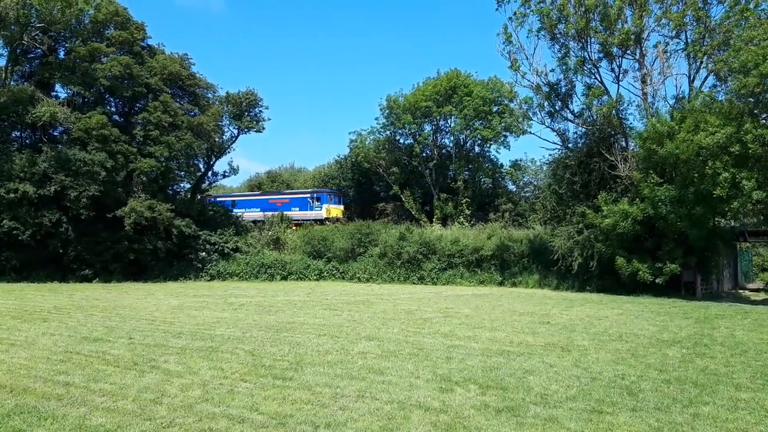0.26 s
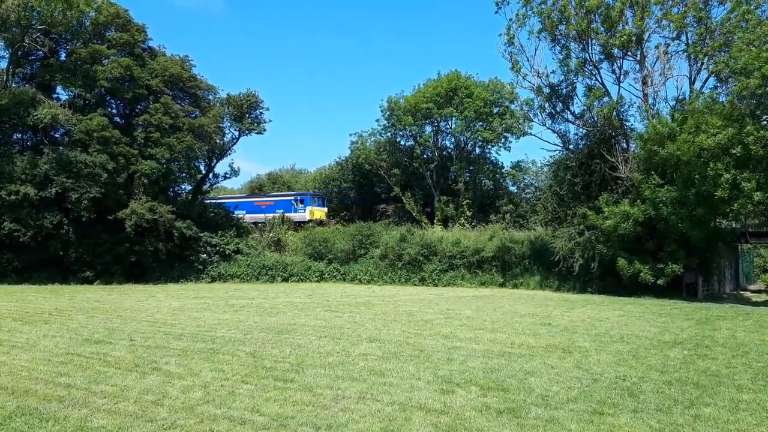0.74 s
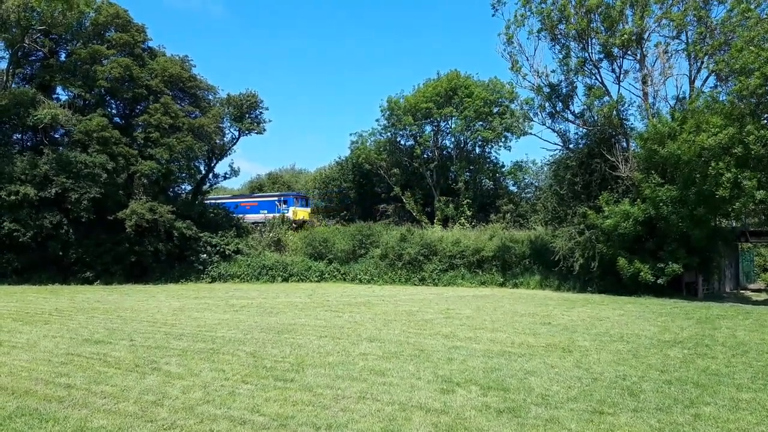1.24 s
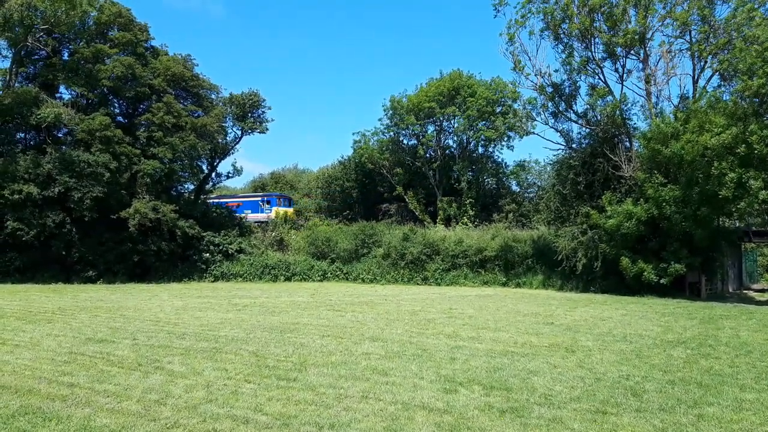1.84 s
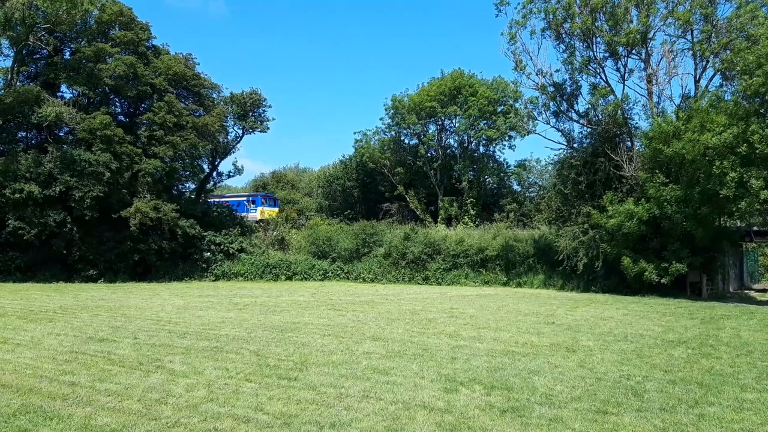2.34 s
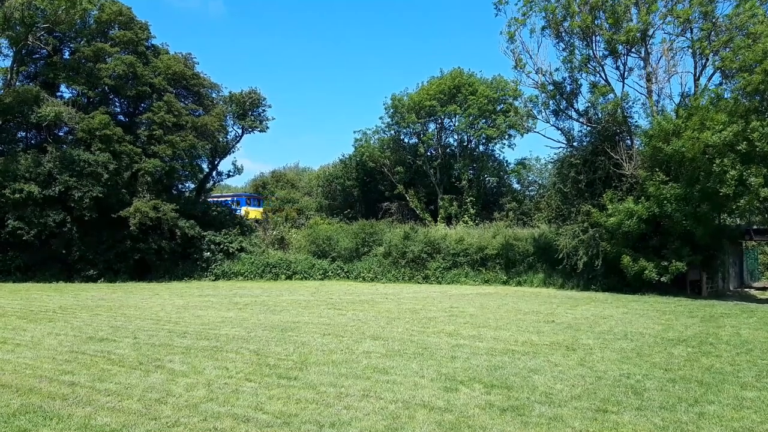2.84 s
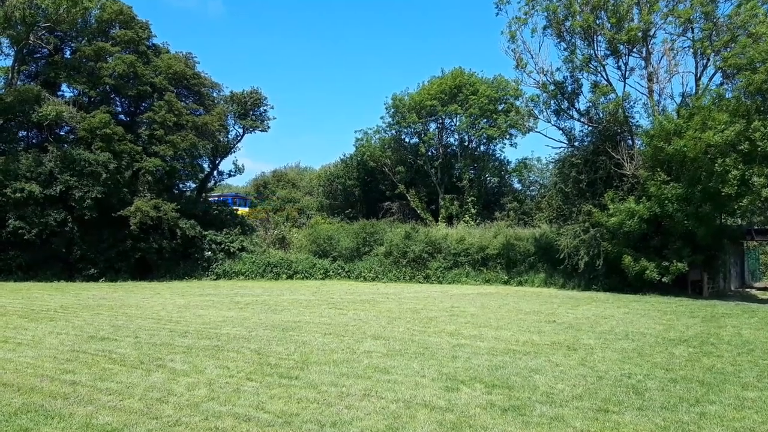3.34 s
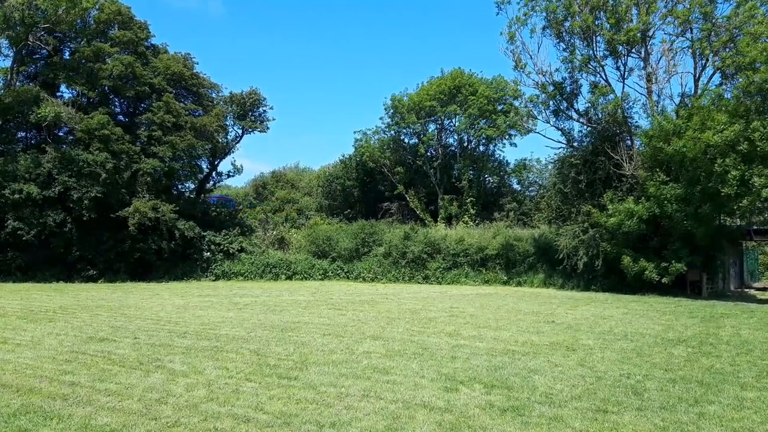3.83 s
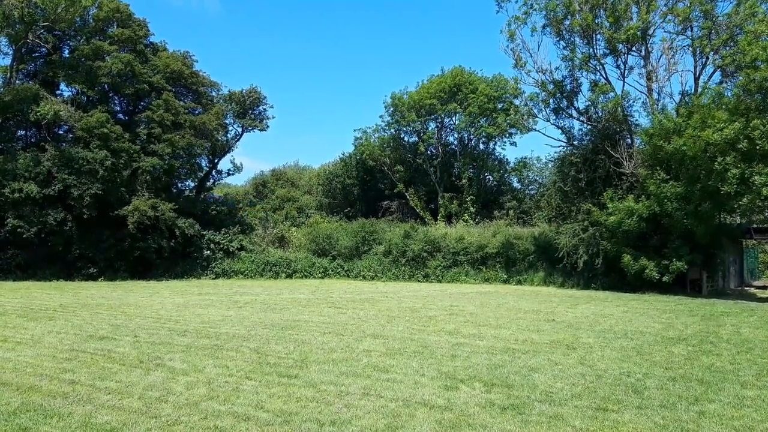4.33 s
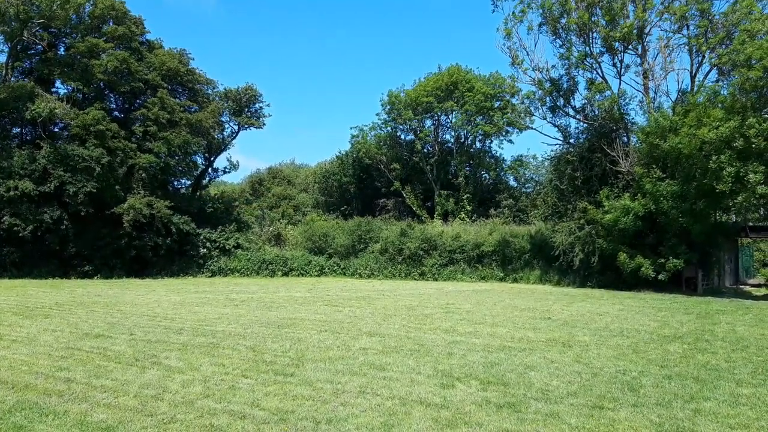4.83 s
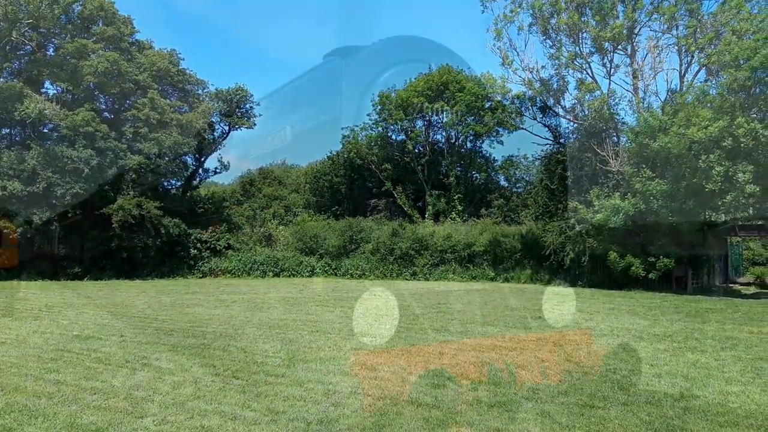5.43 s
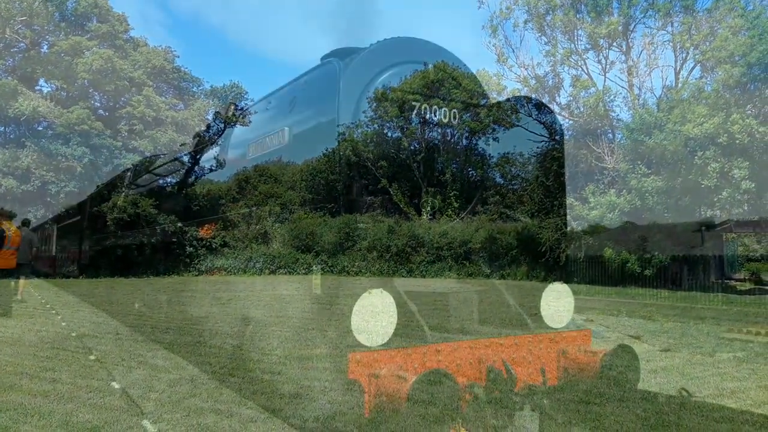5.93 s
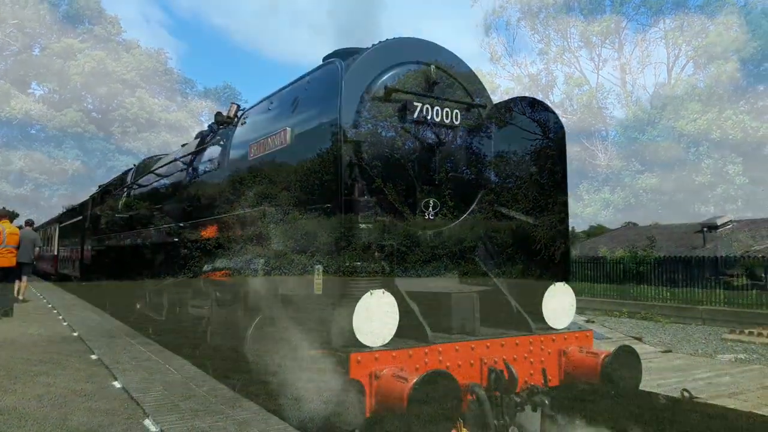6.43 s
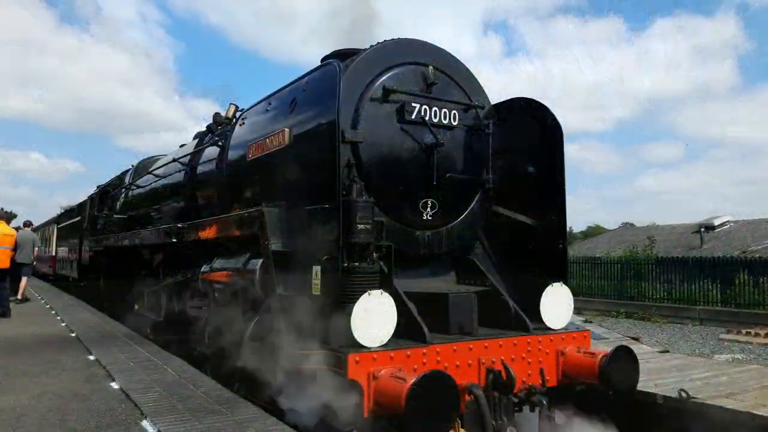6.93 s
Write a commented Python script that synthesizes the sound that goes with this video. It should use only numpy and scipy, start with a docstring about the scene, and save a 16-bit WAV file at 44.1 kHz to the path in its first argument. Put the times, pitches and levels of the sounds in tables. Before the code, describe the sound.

Across an open meadow, a distant train works away behind trees: soft low chuffs nearly three per second, faint rumble, leafy rolling noise, thin flange squeals, a few bird chirps and dull rail-joint clacks. Around three seconds a steam hiss enters quietly and keeps growing, covering the fading train until a standing engine's hollow, sputtering jet fills the close view. Identical, centred sound in both channels.

```python
"""Soft exhaust beats come first, across a meadow: a steam engine working away behind trees, with a low
rumble, rolling noise, a thin flange squeal, dull knocks at rail joints and a few birds. That scene fades
into a standing engine close by, whose steam hisses through the hollows of pipes, frames and platform edge.
Blast, rolling and steam are coloured noise; joints, birds and whistles are short sine tones; squeals and
rail hum are noise in narrow resonances. Both channels carry the same scene, each with its own faint hiss."""
import sys
import numpy as np
from scipy import signal
from scipy.fft import rfft, irfft, next_fast_len
from scipy.io import wavfile
from scipy.ndimage import uniform_filter1d, map_coordinates

SR = 44100
rng = np.random.default_rng(int(sys.argv[2]) if len(sys.argv) > 2 else 0)


def unload_audio(sound):
    """Save the sound as a 16-bit wav file, at the path given as the first command line argument."""
    columns = np.transpose(np.atleast_2d(sound))
    # keep every value between -1 and 1, then stretch to whole-number steps
    steps = np.round(np.clip(columns, -1, 1) * 32767)
    wavfile.write(sys.argv[1], SR, steps.astype(np.int16))


N = 316197
T = np.arange(N) / SR  # time axis in seconds


def amp(db):
    """Decibels to amplitude."""
    return 10 ** (np.asarray(db) / 20)


def unit(x):
    """Scales a signal to an rms of 1."""
    return x / np.sqrt(np.mean(x ** 2) + 1e-20)


def along(points, hz):
    """Reads a value from (freq_hz, value) points along a log frequency axis."""
    point_hz, value = np.transpose(points)
    return np.interp(np.log(hz + 1), np.log(point_hz + 1), value)


def curve(points):
    """Joins (time_s, value) points by straight lines, one value per sample."""
    time_s, value = np.transpose(points)
    return np.interp(T, time_s, value)


def ramp(start_s, end_s):
    """Rises evenly from 0 to 1 between two times."""
    return np.clip((T - start_s) / (end_s - start_s), 0, 1)


def wobble(knots_per_s):
    """A smooth random curve through normally distributed knots."""
    knots = rng.standard_normal(int(N * knots_per_s / SR) + 4)
    return map_coordinates(knots, [T * knots_per_s])


def filtered(x, response):
    """Multiplies the spectrum of x by a response of frequency."""
    size = next_fast_len(N + SR // 2)
    spectrum = rfft(x, size) * response(np.fft.rfftfreq(size, 1 / SR))
    return irfft(spectrum, size)[..., :N]


def shaped(points):
    """The response of a (freq_hz, density_db) spectrum."""
    return lambda hz: amp(along(points, hz))


def peak(hz, centre_hz, width_hz):
    """One resonance: a bell in frequency, 1 at its centre and half that at the edges of its width."""
    return 1 / (1 + (2 * (hz - centre_hz) / width_hz) ** 2)


def resonance_power(hz, resonances):
    """Summed power of (centre_hz, width_hz, level_db) resonances."""
    return sum(amp(2 * db) * peak(hz, centre, width) ** 2 for centre, width, db in resonances)


def hollowed(spectrum, hollows, floor_db):
    """A spectrum shifted to floor_db, with the resonances of hollows standing on it."""
    return lambda hz: shaped(spectrum)(hz) * np.sqrt(amp(2 * floor_db) + resonance_power(hz, hollows))


def rush(response, patchy_db):
    """Coloured turbulent noise of rms 1, its gain varying in soft patches over time and frequency."""
    grid = signal.stft(rng.standard_normal(N), nperseg=512)[2]
    patches = uniform_filter1d(rng.standard_normal(grid.shape), size=8, axis=0)
    patches = unit(uniform_filter1d(patches, size=12, axis=1))
    noise = signal.istft(grid * amp(patchy_db * patches), nperseg=512)[1][:N]
    return unit(filtered(noise, response))


def steady(x, seconds):
    """Evens out the chance swells of narrow noise."""
    power = np.abs(uniform_filter1d(x ** 2, size=round(seconds * SR)))
    return unit(x / np.sqrt(power + 0.16))


# Low end of the distant train, relative: freq_hz [Hz], density_db [dB per Hz]
RUMBLE_SPECTRUM = [(12, -46), (20, -28), (64, -2.5), (92, 3.5), (168, -7), (296, -18.5), (362, -15.5),
                   (400, -28), (520, -51), (880, -120)]


def rumble():
    """Low noise of the train, wavering slowly and sinking as it draws away."""
    start_db, recedes_db_per_s = -43.5, 0.58
    level_db = start_db - recedes_db_per_s * T + 0.47 * wobble(2.97)
    return amp(level_db) * rush(shaped(RUMBLE_SPECTRUM), patchy_db=-0.2)


# Rolling noise among the leaves, relative: freq_hz [Hz], density_db [dB per Hz]
LEAF_SPECTRUM = [(150, -15), (250, -5.5), (436, -10), (748, -2.5), (957, -9), (1200, -9), (1720, -11.5),
                 (2040, -14.5), (2900, -11), (3700, -12.5), (4100, -12.5), (6600, -15.5), (7600, -25),
                 (8800, -43), (9500, -67)]


def rolling():
    """Broad rolling noise of the train among the leaves; it sinks faster than the rumble."""
    start_db, recedes_db_per_s = -43.5, 0.94
    level_db = start_db - recedes_db_per_s * T + 0.25 * wobble(2.38)
    return amp(level_db) * rush(shaped(LEAF_SPECTRUM), patchy_db=1.2)


# Bird chirps: middle_s [s], level_db [dB], pitch_hz at the middle [Hz], length_s [s]
BIRD_CHIRPS = [(.3, -48, 2800, .05), (.55, -50, 3000, 0.07), (1.13, -48, 2980, .06), (1.24, -49, 2800, .05),
               (2.855, -62, 7500, .03)]


def birds():
    """Short sine chirps that slide down a little, with a rough edge from random phase."""
    out = np.zeros(N)
    for middle_s, level_db, pitch_hz, length_s in BIRD_CHIRPS:
        u = (T - middle_s) / length_s
        phase = 2 * np.pi * pitch_hz * (T - middle_s) * (1 - 0.014 * u) + 1.4 * wobble(90)
        out += amp(level_db) * np.exp(-4 * u ** 2) * np.sin(phase)
    return out


# Upper squeal, lower squeal, hum of the rails, in that order: centre_hz [Hz], width_hz [Hz]
RAIL_RESONANCES = [(3670, 86), (1867, 32), (1130, 190)]
# Upper squeal: start_s [s], end_s [s], top_db before the release [dB]
UPPER_SQUEALS = [(.05, 0.398, -52), (.42, 1.283, -50), (1.4, 2.27, -55), (2.2, 3.0, -52)]
# Lower squeal, then hum of the rails: level_db [dB], dying_from_s [s]
LOWER_TONES = [(-59.5, 1.7), (-56.5, 1.7)]


def flanges_and_rails():
    """Squealing flanges and humming rails: noise in narrow resonances that swells or dies away."""
    grows_db_per_s, edge_s, dies_db_per_s = 7, 0.063, 11
    upper = np.zeros(N)
    for start_s, end_s, top_db in UPPER_SQUEALS:
        swell = amp(top_db - grows_db_per_s * np.abs(end_s - T))
        upper += swell * ramp(start_s, start_s + edge_s) * (1 - ramp(end_s - edge_s, end_s))
    gains = [upper]
    for level_db, dying_from_s in LOWER_TONES:
        lost_db = dies_db_per_s * np.maximum(T - dying_from_s, 0)
        gains.append(amp(level_db - lost_db + 1.7 * wobble(2.8)))
    out = np.zeros(N)
    for gain, (centre_hz, width_hz) in zip(gains, RAIL_RESONANCES):
        out += gain * rush(lambda hz: peak(hz, centre_hz, width_hz), patchy_db=1.1)
    return out


# Wheels on rail joints: start_s [s], level_db before the onset is rounded [dB],
# pitch_hz at the strike [Hz], t60_s [s]
JOINT_KNOCKS = [(1.082, -32, 1130, .06), (1.092, -28.5, 700, 0.056), (1.118, -27, 86, 0.15),
                (1.749, -23.5, 1140, 0.033), (1.757, -21.5, 706, 0.047)]


def joints():
    """Short dull clacks that sag in pitch, each with a noisy rattle scattered back from the trees."""
    onset_s, rattle_db, rattle_t60_s = 0.0017, -22.5, 0.45
    clacks, rattle = np.zeros((2, N))
    for start_s, level_db, pitch_hz, t60_s in JOINT_KNOCKS:
        t = np.maximum(T - start_s, 0)
        rise = 1 - np.exp(-t / onset_s)
        sag = 1 - 4 * np.minimum(t, t60_s)
        tone = np.sin(2 * np.pi * pitch_hz * t * sag + 0.92 * wobble(150))
        clacks += amp(level_db - 60 * t / t60_s) * rise * tone
        rattle += amp(level_db + rattle_db - 60 * t / rattle_t60_s) * rise
    return clacks + rattle * rush(lambda hz: peak(hz, 730, 700), patchy_db=2.0)


def puff(u):
    """A burst around u = 0, quicker to rise than to fall, that hangs on a little among the trees."""
    u_abs = np.abs(u)
    body = np.exp(-(u_abs / 0.5) ** np.where(u < 0, 4.5, 2.8))
    tail = amp(-6.5) * (u > 0) * (1 - np.exp(-3 * u_abs)) * np.exp(-1.1 * u_abs)
    return body + tail


# Exhaust beats: middle_s [s], level_db of the boom [dB], bark_db [dB re level_db], length_s [s]
EXHAUST_BEATS = [(0.121, -35, -6.5, 0.11), (0.499, -33.5, -9.5, 0.091), (0.864, -32.5, -11, 0.072),
                 (1.24, -34, -10.5, 0.11), (1.62, -31, -9, 0.071), (1.988, -34, -9, 0.085),
                 (2.344, -36, -9, 0.1), (2.72, -35.5, -8.5, 0.094), (3.097, -34, -7, 0.095),
                 (3.456, -32.5, -11, 0.09), (3.814, -32.5, -8, 0.059), (4.187, -37, -6, 0.085),
                 (4.563, -38.5, 1, 0.075), (4.897, -34.5, -2, 0.11), (5.272, -41.5, -9, 0.065),
                 (5.6, -41, -9, 0.087), (5.936, -34, -10, 0.072)]
# Booming of the blast in the chimney: centre_hz [Hz], width_hz [Hz], level_db [dB, relative]
CHIMNEY_MODES = [(170.7, 28, 2), (205.5, 65, -3), (315, 130, -16)]
# Bark of the blast, relative: freq_hz [Hz], density_db [dB per Hz]
BARK_SPECTRUM = [(250, -23), (330, -1), (450, -4), (750, 3), (950, -1.5), (1200, -44), (1600, -70)]
# Top edge of the blast, relative: freq_hz [Hz], density_db [dB per Hz]
EDGE_SPECTRUM = [(800, -30), (1050, -1.5), (1350, -3), (1750, -13), (3000, -16), (6500, -16), (8500, -55)]


def exhaust():
    """Each beat is a puff of turbulent steam: it booms in the chimney, with a shorter bark and edge above."""
    short_share, edge_db = 0.86, -4.5  # bark length re boom; edge level re bark
    boom, bark = np.zeros((2, N))
    for middle_s, level_db, bark_db, length_s in EXHAUST_BEATS:
        boom += amp(level_db) * puff((T - middle_s) / length_s)
        bark += amp(level_db + bark_db) * puff((T - middle_s) / (short_share * length_s))
    chimney = lambda hz: np.sqrt(resonance_power(hz, CHIMNEY_MODES))
    out = boom * steady(rush(chimney, patchy_db=-0.5), seconds=0.053)
    out += bark * steady(rush(shaped(BARK_SPECTRUM), patchy_db=1.0), seconds=0.054)
    return out + amp(edge_db) * bark * rush(shaped(EDGE_SPECTRUM), patchy_db=1.0)


def far_train():
    """The whole train across the meadow; distance takes away the top of the spectrum."""
    top_hz = 8900
    train = rumble() + rolling() + birds() + flanges_and_rails() + joints() + exhaust()
    return filtered(train, lambda hz: hz < top_hz)


# Falling whistles in the jet, before sputter and fade: middle_s [s], level_db [dB],
# from_hz [Hz], to_hz [Hz], length_s [s]
JET_WHISTLES = [(3.99, -26, 2620, 2280, .055), (4.03, -27, 4030, 3500, .06),
                (7.025, -25, 3800, 3600, 0.031)]


def whistles():
    """Short rough sine tones that slide down within the jet."""
    out = np.zeros(N)
    for middle_s, level_db, from_hz, to_hz, length_s in JET_WHISTLES:
        u = (T - middle_s) / length_s
        pitch_hz = (from_hz + to_hz) / 2 + (to_hz - from_hz) / 2 * np.tanh(u)
        phase = 2 * np.pi * np.cumsum(pitch_hz) / SR + 0.9 * wobble(90)
        out += amp(level_db) * np.exp(-2 * u ** 2) * np.sin(phase)
    return out


# Roar with the notches of the ground echo, relative: freq_hz [Hz], density_db [dB per Hz]
ROAR_SPECTRUM = [(60, -36), (150, -16), (250, -9), (320, -2.5), (385, -2), (415, -14), (470, -5.5),
                 (520, -19.5), (590, -16.5), (665, -0.5), (780, -2.5), (830, -22.5), (950, -14),
                 (1100, -36)]
# Hollows that sing within the roar: centre_hz [Hz], width_hz [Hz], level_db [dB re the roar spectrum]
ROAR_HOLLOWS = [(328, 36, 0), (672, 44, 0)]


def roar(flow_db):
    """Low part of the jet, singing in two hollows; it follows the flow the least."""
    mean_flow_db, grows_db_per_db = -21, 0.54
    noise = rush(hollowed(ROAR_SPECTRUM, ROAR_HOLLOWS, floor_db=-1.1), patchy_db=-0.34)
    return amp(mean_flow_db + grows_db_per_db * flow_db) * noise


# Body of the hiss, relative: freq_hz [Hz], density_db [dB per Hz]
HISS_SPECTRUM = [(600, -39), (850, -8.5), (1040, -3.5), (1170, -6), (1290, -4.5), (2060, -5.5), (3200, -6),
                 (4480, -5), (5500, -10.5), (7000, -28), (9000, -62)]
# Hollows that colour the hiss: centre_hz [Hz], width_hz [Hz], level_db [dB re the hiss spectrum]
HISS_HOLLOWS = [(1044, 28, 9), (1175, 30, 2), (1302, 43, 5), (1407, 27, 4), (1515, 48, 4), (1625, 24, 5),
                (1709, 24, 5), (1866, 22, 6), (2176, 27, 4), (2565, 60, 3.5), (2668, 38, 5), (3033, 60, 4),
                (3403, 38, 4), (3595, 90, 4), (3736, 60, 3), (4062, 60, 3), (4510, 90, 4), (5160, 65, 3)]


def hiss(flow_db):
    """Middle part of the jet, ringing through the hollows of pipes, frames and platform edge."""
    mean_flow_db, grows_db_per_db = -18, 0.83
    noise = rush(hollowed(HISS_SPECTRUM, HISS_HOLLOWS, floor_db=-1.0), patchy_db=0.81)
    return amp(mean_flow_db + grows_db_per_db * flow_db) * noise


# Fizz on top of the jet, relative: freq_hz [Hz], density_db [dB per Hz]
FIZZ_SPECTRUM = [(3500, -27), (4800, -3.5), (6000, -3.5), (8200, -2), (9300, -5), (10300, -13.5),
                 (12000, -13.5), (13900, -16), (15000, -18.5), (16000, -32)]
# Slow level of the fizz at mean flow, before the fade: time_s [s], level_db [dB]
FIZZ_LEVELS = [(3.1, -20), (3.8, -19), (4.6, -22), (5.4, -22), (6, -19.5), (6.5, -21.5), (7.17, -21)]


def fizz(flow_db):
    """Top part of the jet; it follows the flow the most and flickers on its own."""
    grows_db_per_db = 1.3
    flicker_db = 0.76 * wobble(35) + 0.67 * wobble(8)
    level_db = curve(FIZZ_LEVELS) + grows_db_per_db * flow_db + flicker_db
    return amp(level_db) * rush(shaped(FIZZ_SPECTRUM), patchy_db=1.5)


# Flow of the jet about its mean: time_s [s], flow_db [dB]
JET_FLOW = [(3.1, 2.5), (3.5, -0.5), (3.87, -3), (4.05, -2.2), (4.48, -2.5), (4.68, 1), (4.85, -0.5),
            (5.0, 1), (5.13, 2), (5.22, -.5), (5.52, 0), (5.62, 2.5), (5.76, -.3), (5.92, 1.3),
            (6.05, -0.4), (6.25, 0.5), (6.35, 0), (6.6, -0.6), (6.85, 1), (6.94, 1), (7.02, 2.5), (7.17, 1)]


def steam():
    """A jet of steam: roar, hiss and fizz follow one flow and flutter together as it sputters."""
    start_s = 3.093
    flow_db = curve(JET_FLOW)
    sputter_db = 0.35 * wobble(30) + 0.45 * wobble(70)
    jet = roar(flow_db) + hiss(flow_db) + fizz(flow_db) + whistles()
    return (T > start_s) * amp(sputter_db) * jet


def scene():
    """The far train fades out under the near steam, whose amplitude rises evenly; both channels alike."""
    far = (1 - ramp(5.87, 6.6)) * far_train()
    near = ramp(3.063, 7.07) * steam()
    return np.tile(far + near, (2, 1))


# Hiss of the electronics, relative: freq_hz [Hz], density_db [dB per Hz]
CIRCUIT_SPECTRUM = [(6000, -42), (8500, 0), (16000, 0)]


def record(dry):
    """Each channel adds its own faint electronic hiss; nothing is kept above the band limit."""
    circuit_db, top_hz = -77, 15750
    circuit = np.array([rush(shaped(CIRCUIT_SPECTRUM), patchy_db=spread) for spread in (3.0, 1.5)])
    return filtered(dry + amp(circuit_db) * circuit, lambda hz: hz < top_hz)


dry = scene()
out = record(dry)
unload_audio(out)
```